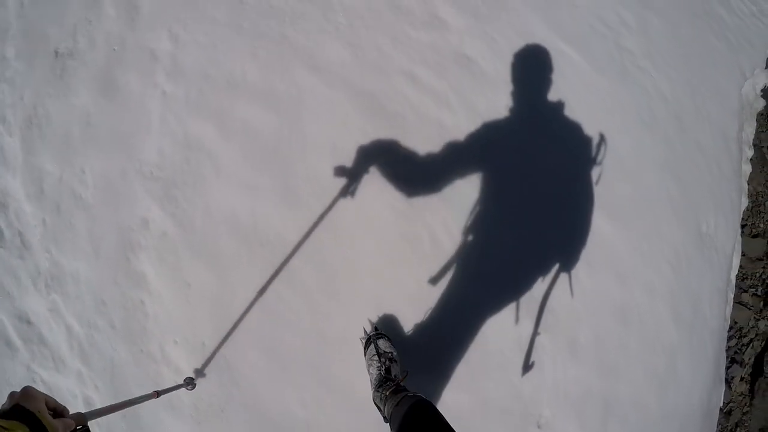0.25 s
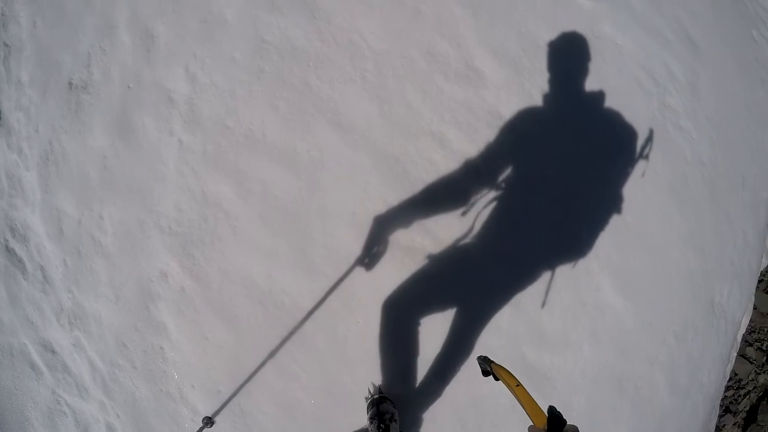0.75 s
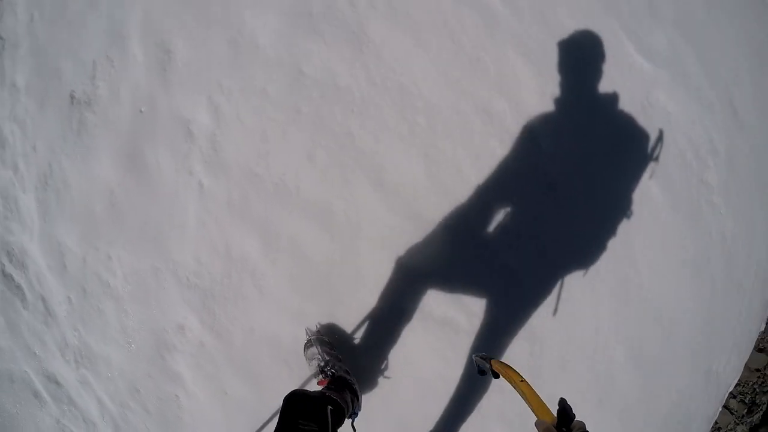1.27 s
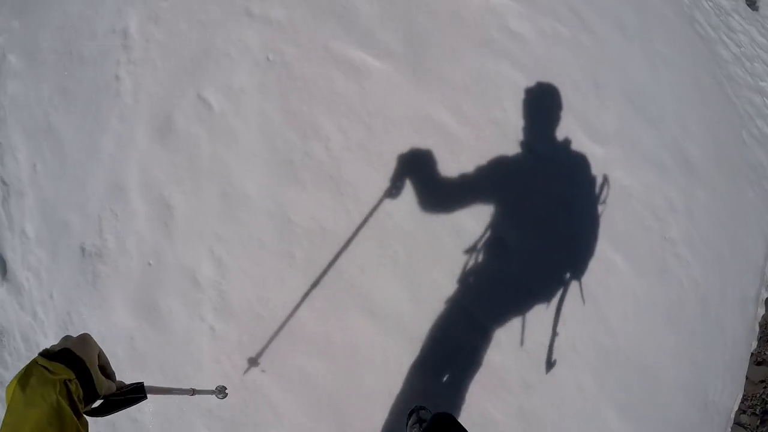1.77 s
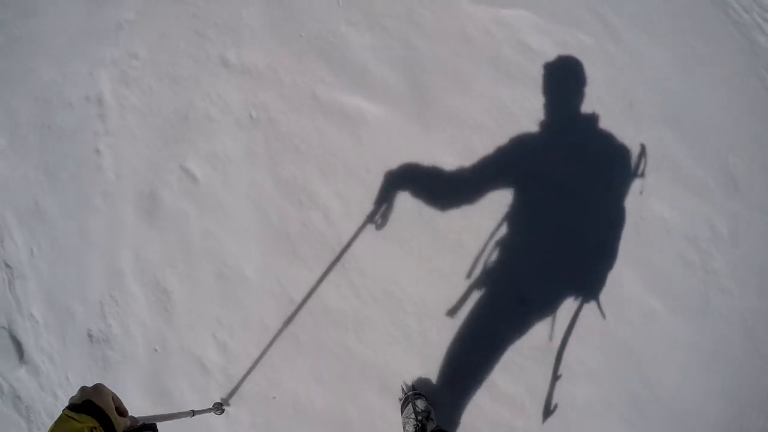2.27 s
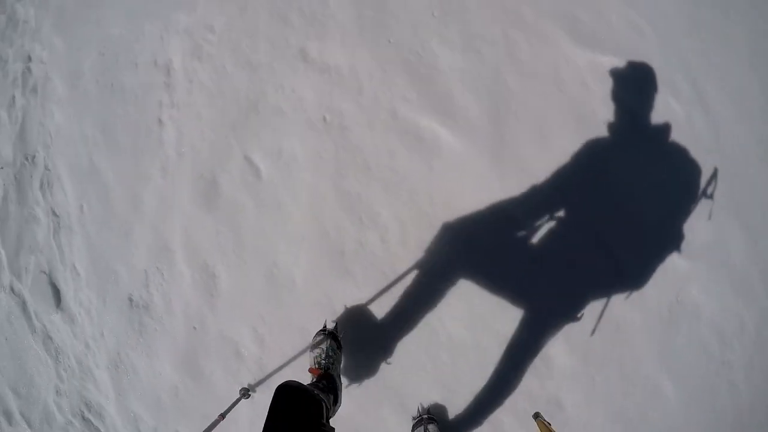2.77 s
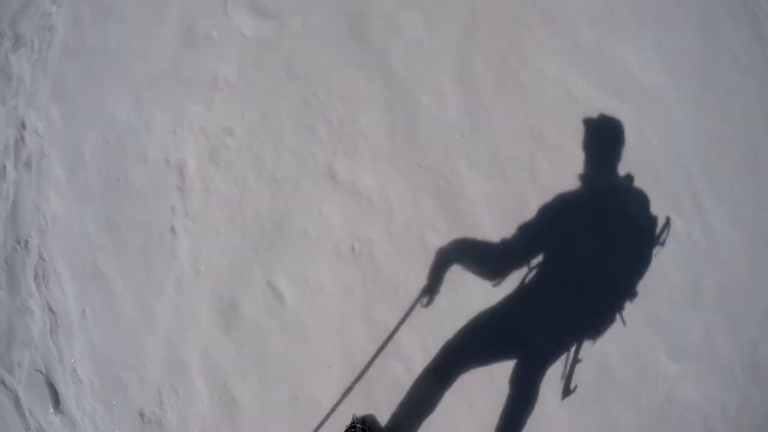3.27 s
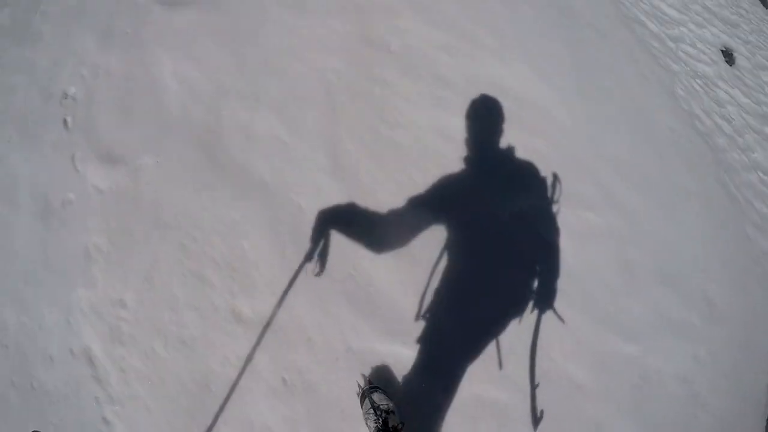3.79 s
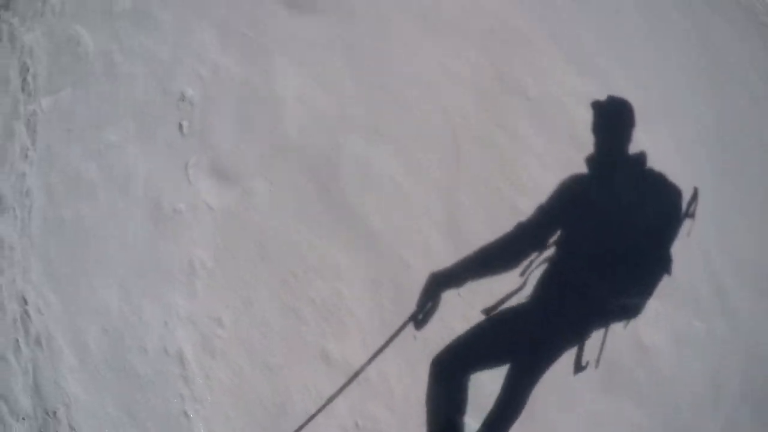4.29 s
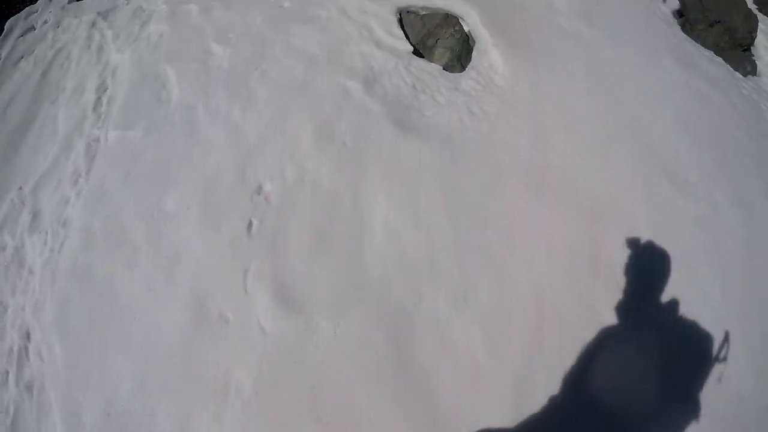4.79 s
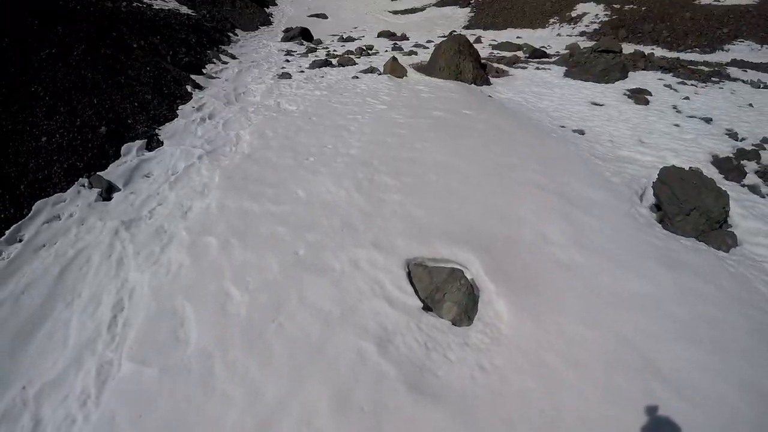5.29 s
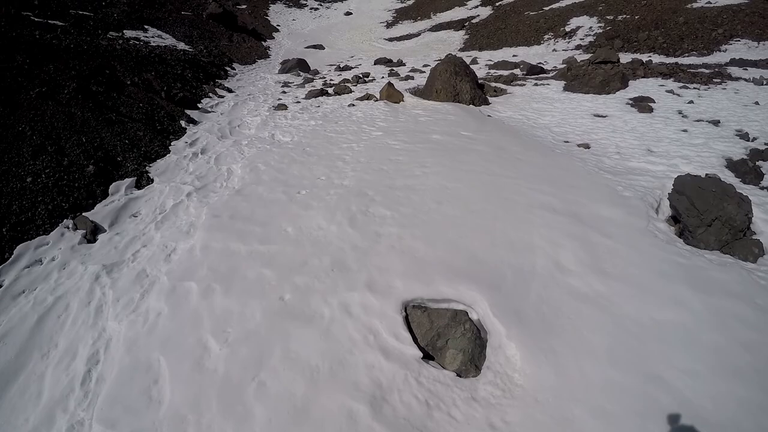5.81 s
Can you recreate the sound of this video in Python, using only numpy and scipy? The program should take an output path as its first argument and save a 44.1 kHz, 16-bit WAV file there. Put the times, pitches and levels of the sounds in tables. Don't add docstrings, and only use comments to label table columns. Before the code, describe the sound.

Outdoors on a snowy slope, heard from inside a closed camera case on a walker's helmet. Deep wind gusts thump the shell throughout, with soft jacket swishes and a humming strap rub. A boot crunches thinly into firm snow about every 0.9 seconds, with small cracks from spikes and pole tip between. Dull knocks punctuate the jolts, and the mount creaks and slips busily at the end.

```python
import sys
import numpy as np
from scipy import signal
from scipy.fft import rfft, irfft, next_fast_len
from scipy.io import wavfile
from scipy.ndimage import uniform_filter1d, map_coordinates

SR = 44100
rng = np.random.default_rng(int(sys.argv[2]) if len(sys.argv) > 2 else 0)


def elevation(decibels):
    levels = np.asarray(decibels, float)
    return 10 ** (levels / 20)


def put_to_file(sound):
    columns = np.atleast_2d(sound).T
    safe = np.clip(columns, -1, 1)
    whole_steps = np.round(safe * 32767)
    wavfile.write(sys.argv[1], SR, whole_steps.astype(np.int16))


N = 266805


def unit(x):
    return x / np.sqrt(np.mean(x ** 2) + 1e-20)


def even(x, seconds):
    power = np.abs(uniform_filter1d(x ** 2, round(seconds * SR)))
    return unit(x / (power + 1e-20) ** 0.3)


def curves(rows):
    s, *cols = np.transpose(rows)
    return [np.interp(np.arange(N) / SR, s, c) for c in cols]


def swells(rows, calm_db):
    t = np.arange(0, N + 32, 32) / SR
    power = sum(elevation(2 * db) * np.exp(-2 * ((t - s) / width) ** 2) for s, width, db in rows)
    return np.sqrt(elevation(2 * calm_db) + np.interp(np.arange(N) / SR, t, power))


def wobble(rate):
    knots = rng.standard_normal(int(N * rate / SR) + 4)
    return map_coordinates(knots, [np.arange(N) * rate / SR])


def grains(spiky_db):
    size_db = spiky_db * np.minimum(rng.exponential(size=N), 4)
    return unit(rng.standard_normal(N) * elevation(size_db))


def filtered(x, response):
    m = next_fast_len(N + 8192)
    return irfft(rfft(x, m) * response(np.fft.rfftfreq(m, 1 / SR)), m)[..., :N]


def shape(points):
    f, db = np.transpose(points)
    return lambda hz: elevation(np.interp(np.log(hz + 1), np.log(f + 1), db))


def resonances(peaks):
    def response(f):
        return sum((-1) ** k * elevation(db) * 1j * f * w / (c * c - f * f + 1j * f * w)
                   for k, (c, w, db) in enumerate(peaks))
    return response


def add(track, s, x):
    track[round(s * SR):][:len(x)] += x


# time_s, level_db
BREEZE = [(0, -42), (.45, -39.5), (.95, -44.5), (1.05, -49.5), (1.3, -41.5), (1.7, -41.5), (2.2, -37),
          (2.56, -49), (2.9, -44), (3.3, -45.5), (3.67, -40), (4.0, -35), (4.36, -46), (4.72, -35.5),
          (5.0, -33.5), (5.26, -39), (5.5, -31.5), (6.05, -35.5)]
# peak_s, half_width_s, level_db
GUSTS = [(.004, 0.038, -23.5), (.22, 0.023, -33.5), (.335, 0.039, -34), (.53, 0.058, -29), (.605, .05, -20),
         (.76, .12, -30), (.92, 0.045, -36.5), (1.16, 0.058, -34.5), (1.26, 0.05, -35),
         (1.43, 0.065, -30.5), (1.57, 0.043, -28.5), (1.77, 0.032, -32.5), (1.91, 0.037, -30.5),
         (2.0, 0.048, -29), (2.125, 0.024, -34.5), (2.35, 0.077, -30.5), (2.51, .03, -37),
         (3.12, 0.084, -35), (3.82, 0.072, -26.5), (4.07, 0.052, -28), (4.23, 0.055, -33.5),
         (4.55, 0.069, -28), (4.67, 0.032, -21.5), (4.87, 0.072, -27), (5.08, .04, -28),
         (5.155, 0.034, -24.5), (5.34, 0.026, -22.5), (5.58, 0.14, -29.5), (5.74, 0.059, -28),
         (5.94, 0.085, -30)]
# peak_s, half_width_s, level_db
EDDIES = [(.004, 0.024, -37.5), (.25, .04, -54), (.335, 0.027, -38.5), (.5, 0.059, -41.5), (.6, .04, -37.5),
          (.7, 0.066, -48), (.93, 0.046, -52.5), (1.16, 0.037, -38), (1.26, 0.033, -39.5), (1.56, .06, -55),
          (1.77, 0.046, -52), (1.92, .03, -52), (2.05, 0.047, -45), (2.21, .05, -48), (2.32, 0.041, -43),
          (2.51, .03, -46), (3.06, .1, -48.5), (3.84, 0.063, -40.5), (3.98, 0.047, -48), (4.19, 0.041, -47),
          (4.52, 0.03, -32), (4.74, 0.052, -35), (4.91, 0.035, -32.5), (5.07, 0.053, -37),
          (5.17, 0.037, -39.5), (5.34, .02, -40), (5.42, 0.025, -36), (5.48, .025, -33), (5.53, .02, -38),
          (5.575, 0.03, -31), (5.625, .02, -31), (5.67, 0.044, -27), (5.8, .05, -40), (5.9, 0.06, -33),
          (5.98, 0.048, -37.5)]
# pitch_hz, level_db (per Hz)
BUFFET = [(8.8, -61), (15, 0), (32, 3), (49, 3), (62, -3), (110, -30), (140, -56), (240, -120)]
# pitch_hz, level_db (per Hz)
FLUTTER = [(47, -34.5), (80, 2), (166, -13), (357, -33), (426, -42), (500, -40), (650, -81), (1100, -120)]


def wind():
    breeze_db, = curves(BREEZE)
    buffet = swells(GUSTS, breeze_db)
    flutter = swells(EDDIES, breeze_db - 20.5)
    slow = even(filtered(rng.standard_normal(N), shape(BUFFET)), 0.0545)
    fast = even(elevation(5.1 * wobble(30)) * filtered(rng.standard_normal(N), shape(FLUTTER)), 0.053)
    push = buffet * slow
    push = push / (1 + np.abs(push / .13) ** 4) ** .25
    return push + elevation(-1.5) * flutter * fast


# peak_s, half_width_s, swish_db, cloth_db (relative to the swish)
SWINGS = [
    (.03, 0.19, -71, 7),
    (.45, .3, -71, -1),
    (1.33, 0.46, -70, -0.5),
    (2.31, 0.15, -63.5, -6),
    (3.13, 0.21, -65.5, -4),
    (3.55, 0.36, -75.5, 3),
    (4.03, 0.16, -62, -2.5),
    (4.87, 0.14, -64, -6),
    (5.19, 0.074, -72, 9),
    (5.78, .12, -73, 6),
]
# pitch_hz, level_db (per Hz)
SWISH = [(2060, -58), (3500, -8), (5260, -2), (7790, -10), (8500, -14), (9250, -10.5), (10200, -16.5),
         (14300, -42)]
# pitch_hz, level_db (per Hz)
CLOTH = [(650, -47), (1100, -3), (1600, -3), (1830, -5.5), (2320, 0), (3500, -19.5), (4550, -27),
         (7700, -120)]


def clothes():
    swish = swells([row[:3] for row in SWINGS], calm_db=-72)
    cloth = swells([(s, width, db + share_db) for s, width, db, share_db in SWINGS], calm_db=-73)
    rub = elevation(2.05 * wobble(40) + 1.74 * wobble(250)) * grains(spiky_db=4.0)
    smooth = unit(filtered(rub, shape(SWISH)))
    heavy = unit(filtered(rub, shape(CLOTH)))
    return elevation(-3.0) * swish * smooth + elevation(-6.0) * cloth * heavy


# start_s, length_s, rub_db, grit_db (relative to the rub)
STROKES = [(0.081, 0.15, -52, -12.5), (0.202, 0.23, -58, -12), (0.441, 0.14, -56, -12.5),
           (0.724, 0.13, -56.5, -8), (0.79, 0.22, -51.5, -11), (1.1, 0.18, -52, -11),
           (1.277, 0.08, -49.5, -13), (1.38, .07, -58.5, -12), (1.459, .11, -53, -16),
           (1.58, .1, -61.5, -6.5), (1.732, .12, -58.5, -15.5), (1.98, .2, -65.5, -9.5),
           (2.217, 0.18, -54, -13), (2.421, .12, -52, -19), (2.6, .06, -52, -14), (2.72, .2, -63, -12),
           (2.93, 0.33, -55.5, -16), (3.228, 0.097, -58, -13), (3.478, .03, -54, -21),
           (3.51, 0.085, -58, -15), (3.777, .3, -61, -16), (4.088, .13, -54.5, -12),
           (4.233, .035, -42.5, -21), (4.468, .08, -53.5, -12), (4.658, .16, -53, -14.5),
           (4.832, 0.096, -53.5, -21), (4.95, 0.19, -61.5, -9.5), (5.163, 0.15, -57.5, -10),
           (5.33, 0.15, -71.5, 1.5), (5.502, 0.52, -59, -8)]
# pitch_hz, width_hz, level_db
HUM = [(278, 75, -3.5), (362, 64, 0)]
# pitch_hz, width_hz, level_db
GRIT = [(601, 80, 4.5), (825, 140, -4), (1027, 51, -1), (1870, 110, -8)]


def strap():
    rise_s, fall_s, slack_db = 0.021, .017, -76
    t = np.arange(N) / SR
    s, length, rub_db, grit_db = np.transpose(STROKES)[:, :, None]
    pull = np.clip((t - s) / rise_s + .5, 0, 1) ** 2
    pull = pull * np.exp(-2 * np.maximum(t - s - length, 0) / fall_s)
    force = np.sqrt(elevation(2 * slack_db) + (elevation(2 * rub_db) * pull).sum(axis=0))
    grit = np.sqrt(elevation(2 * slack_db) + (elevation(2 * (rub_db + grit_db)) * pull).sum(axis=0))
    rub = elevation(3.2 * wobble(45)) * grains(spiky_db=3)
    hum = even(filtered(rub, lambda f: resonances(HUM)(f) ** 1.115), 0.075)
    scrape = even(filtered(rub, resonances(GRIT)), 0.087)
    return elevation(-2.0) * force * hum + elevation(-0.43) * grit * scrape


# peak_s, half_width_s, level_db
WEBBING = [
    (.1, .16, -73),
    (3.4, 0.12, -70.5),
    (3.6, 0.085, -74.5),
    (3.745, 0.026, -64.5),
    (5.2, 0.036, -68.5),
]
# pitch_hz, width_hz, level_db
WEBBING_RING = [(2320, 320, 0)]


def webbing():
    rub = elevation(3.2 * wobble(60)) * grains(spiky_db=3.5)
    return swells(WEBBING, calm_db=-95) * unit(filtered(rub, resonances(WEBBING_RING)))


# start_s, length_s, pitch_hz, level_db (peak)
SQUEAKS = [(2.602, 0.03, 385, -41), (2.426, 0.015, 840, -53), (4.509, .028, 391, -32),
           (4.512, .022, 570, -38), (4.83, .02, 470, -38), (4.842, .02, 260, -38), (2.606, .025, 590, -54),
           (.75, .03, 590, -55), (.83, .03, 600, -56), (.9, .03, 570, -55), (.95, .03, 610, -56),
           (.49, .025, 360, -48), (.215, .025, 320, -48), (.995, .025, 350, -48), (5.153, .021, 325, -29.5),
           (2.425, .02, 340, -47), (2.458, .02, 370, -48), (2.645, .04, 590, -57), (2.73, .02, 340, -54),
           (3.477, .02, 340, -45), (5.795, .025, 325, -39), (5.83, .04, 330, -47), (5.652, .02, 230, -30),
           (4.235, .03, 385, -42)]


def squeaks():
    out = np.zeros(N + SR)
    for s, length, hz, db in SQUEAKS:
        t = np.arange(round(length * SR)) / SR
        note = np.sin(2 * np.pi * hz * t) + 0.084 * np.sin(4 * np.pi * hz * t)
        add(out, s, elevation(db) * np.sin(np.pi * t / length) * note)
    return out[:N]


# start_s, level_db (peak), pitch_hz,
# length_s
CRACKS = [(.2712, -57, 4960, .004), (.305, -51, 9200, .005), (.318, -54, 8900, .005),
          (.349, -51, 2300, .004), (.388, -58, 5000, .003), (0.5, -51, 5400, .004),
          (.7875, -57, 5250, .005), (1.2505, -50, 2000, .004), (1.135, -48, 7700, .006),
          (1.148, -51, 9200, .005), (1.5243, -54, 6410, .01), (2.04, -52, 9300, .005),
          (2.055, -54, 7800, .005), (2.1893, -62, 5400, .005), (2.306, -56, 5270, .005),
          (2.503, -51, 2100, .004), (2.5121, -53, 6480, .008), (2.61, -57, 1050, .014),
          (2.612, -59, 1750, .012), (2.655, -63, 1700, .012), (2.849, -56, 2200, .004),
          (3.18, -57, 5020, .004), (3.304, -58, 7200, .006), (3.318, -52, 6450, .012),
          (3.716, -53, 4520, .006), (3.733, -55, 4500, .005), (3.785, -57, 1350, .02),
          (3.794, -52, 9100, .012), (3.804, -54, 7600, .01), (3.999, -58, 5450, .004),
          (4.039, -55, 4680, .004), (4.123, -58, 4310, .004), (4.225, -57, 7500, .006),
          (4.685, -52, 9000, .005), (4.697, -54, 6000, .005), (4.802, -60, 5280, .004),
          (5.1503, -55, 3400, 0.0046), (5.1515, -51, 2150, .005), (5.3094, -54, 2100, .006),
          (5.648, -55, 2400, .004), (5.692, -54, 2450, .005), (5.699, -52, 1950, .008),
          (5.794, -54, 1650, .005), (5.795, -57, 2600, .004), (5.81, -57, 2350, .01),
          (.2995, -57, 12300, .003), (.299, -55, 9200, .003), (4.832, -43, 1040, .012),
         (1.133, -52, 10800, .006), (1.135, -51, 5000, .008), (3.828, -56, 9200, .006),
         (1.1315, -56, 12600, .003), (1.16, -60, 11800, .004), (2.035, -58, 11800, .003),
         (2.93, -52, 9200, .003), (2.931, -58, 11500, .003), (3.783, -51, 9300, .003),
         (3.785, -58, 12300, .003), (4.678, -52, 9200, .003), (4.6785, -58, 12500, .003),
         (4.833, -55, 1350, .008), (4.834, -59, 2150, .005), (5.998, -57, 1800, .012)]


def cracks():
    out = np.zeros(N + SR)
    t, f = np.arange(2048) / SR, np.fft.rfftfreq(2048, 1 / SR)
    for s, db, hz, length in CRACKS:
        burst = rng.standard_normal(len(t)) * (1 - np.exp(-t / .0006)) * np.exp(-(t / length) ** 2)
        ring = irfft(rfft(burst) * resonances([(hz, hz / 10, 0)])(f))
        add(out, s, elevation(db) * ring / np.abs(ring).max())
    return out[:N]


# time_s, level_db (peak), crush_s
STEPS = [
    (0.2975, -46, 0.023),
    (1.131, -43, 0.019),
    (2.033, -47, 0.022),
    (2.9275, -47, 0.016),
    (3.782, -44, 0.019),
    (4.676, -47, 0.025),
]
# time_s, level_db (peak), coarse_db, pack_db (both relative), crush_s
CRUMBS = [(0.3444, -64, 5, 9.5, 0.013), (0.4673, -61, 1.5, -11, 0.0093), (0.4988, -60, 3, -7, 0.0063),
          (0.5501, -57, -3, -5, 0.0088), (0.6998, -53.5, -4.5, -14, 0.012), (1.2994, -58, -8, 1, 0.0092),
          (1.4394, -58.5, -1, -8, 0.0089), (1.5239, -60, -14, -11, 0.0093), (2.3062, -65, -5, -7, 0.021),
          (2.5117, -58, -3, -12, 0.0094), (2.9494, -61, -15, -16, 0.0097), (3.1094, -60, -9, -13, 0.019),
          (3.3106, -54, -5, -12, 0.012), (3.715, -57, 3, 4, 0.0072), (3.732, -64, 3, 1, 0.007),
          (3.824, -56, -9, -8, 0.0092), (4.038, -56, 4, -7, 0.0044), (4.1215, -62, 4.5, 0, 0.0092),
          (4.2194, -59.5, -1, -7, 0.021), (4.8294, -58, -3, -5, 0.0087), (5.1494, -59, 3, 10.5, 0.006),
          (5.6471, -60, -2, 3, 0.013), (5.692, -63, 0, 11, 0.011), (5.795, -68, 0, 12, 0.013)]
# pitch_hz, width_hz, level_db
FINE = [(6860, 910, -6), (7870, 430, 0.5), (9200, 320, 5), (11200, 1600, -9.5), (12700, 990, -14)]
# pitch_hz, width_hz, level_db
COARSE = [(3440, 540, -2.5), (4940, 630, 3), (5850, 1100, -0.5)]
# pitch_hz, width_hz, level_db
PACKING = [(1440, 330, -3), (1890, 250, 0), (2470, 310, -1.5)]


def snow():
    rise_share = 0.42
    t = np.arange(SR // 5) / SR

    def press(hold):
        rise = 1 - np.exp(-(t / (rise_share * hold)) ** 2)
        return rise / np.sqrt(1 + (t / hold) ** 4) * (t < 6 * hold)

    def crunch(peaks):
        return unit(filtered(elevation(2.6 * wobble(250)) * grains(spiky_db=4.2), resonances(peaks)))

    fine, coarse, pack = np.zeros((3, N + SR))
    steps = [(s, db, -7.5, -12.5, crush) for s, db, crush in STEPS]
    for s, db, coarse_db, pack_db, crush in steps + CRUMBS:
        start = s - rise_share * crush
        add(fine, start, elevation(db - 10.5) * press(crush))
        add(coarse, start, elevation(db + coarse_db - 5) * press(1.36 * crush))
        add(pack, start, elevation(db + pack_db - 6.0) * press(1.4 * crush))
    return fine[:N] * crunch(FINE) + coarse[:N] * crunch(COARSE) + pack[:N] * crunch(PACKING)


# pitch_hz, width_hz, level_db
BOOM = [(153, 140, -11.5), (268, 76, 3.5), (380, 100, 0.5)]
# pitch_hz, width_hz, level_db
KNOCK = [(570, 120, -2.5), (695, 110, -2.5), (830, 150, -3.5), (1015, 85, 3)]
# pitch_hz, width_hz, level_db
TICK = [(1340, 69, -6.5), (1790, 144, -3.5), (2010, 260, -6), (3000, 790, -17)]


def blow(boom_db, tick_db, scatter_db, top_hz=6000, pad_hz=1500):
    modes = []
    for rows, extra_db in ((BOOM, boom_db), (KNOCK, 0), (TICK, tick_db)):
        for hz, width, db in rows:
            modes.append((hz, width, db + extra_db + rng.normal(0, scatter_db)))
    f = np.fft.rfftfreq(4096, 1 / SR)
    soft = 1 / (1 + 1j * f / pad_hz) ** 3 / (1 + (f / top_hz) ** 14)
    dead_hz, dead_wide_hz, left = 1160, 260, .15
    gap = dead_hz ** 2 - f * f
    dead = (gap + 1j * f * dead_wide_hz * left) / (gap + 1j * f * dead_wide_hz)
    bending = .017
    late = np.exp(-4j * np.pi * bending * np.sqrt(f))
    return irfft(resonances(modes)(f + 1) * soft * dead * late)


# time_s, level_db (peak), boom_db, tick_db (both relative)
KNOCKS = [(0.551, -62, 0, 1), (0.683, -31.5, -7.5, -35), (1.109, -52, -18, -8), (1.253, -26, -8, -25),
          (1.534, -26.5, -10, -28.5), (2.05, -49, -5, -9), (2.505, -25, -8.5, -24.5),
          (2.749, -55, -11, -11), (2.849, -46, -14, -11), (3.194, -31, -7.5, -31), (3.713, -56, -12, -5),
          (4.212, -28.5, -8, -40), (4.807, -58, 6, -20), (5.152, -28.5, -12, -28), (5.221, -46.5, -5, -24),
          (5.296, -40, -9, -30), (5.311, -45, -18, -15), (5.647, -35, -1, -36)]
# delay_s, level_db
CHATTER = [
    (-.0006, -14),
    (.0016, -13),
    (.0027, 3),
    (.0095, -11.5),
]


def knocks():
    out = np.zeros(N + SR)
    for s, db, boom_db, tick_db in KNOCKS:
        for late, more_db in CHATTER:
            at = s - .0038 + late + rng.normal(0, 0.0001)
            hit = elevation(db + 32.2 + more_db) * blow(boom_db + 14.3, tick_db + 14.5, scatter_db=0.6)
            add(out, at, hit)
            add(out, at + .0125 + late, elevation(-20) * hit)
    return out[:N]


CREAK_TOP_HZ = 2150

# start_s, length_s, level_db (rms), boom_db, tick_db (both relative)
CREAKS = [
    (4.51, 0.026, -41, -2, -4),
    (4.827, 0.022, -39, -2, -14),
    (5.684, 0.03, -45, -15, -32),
    (5.752, 0.045, -50, -3, -22),
    (5.79, 0.058, -46, -2.5, -24),
    (5.843, 0.072, -50.5, 3, -21),
    (2.9, 0.035, -63.5, -2, -1),
    (5.99, .02, -55, -1.5, -1),
    (5.152, 0.014, -40.5, -3, -17),
    (4.9, 0.013, -60, 0, -6),
]


def creaks():
    out = np.zeros(N + SR)
    for s, length, db, boom_db, tick_db in CREAKS:
        run = np.zeros(SR // 2)
        gap = rng.uniform(.4, 1.6, 60) / 560
        size_db = rng.normal(0, 2.5, 60)
        slip = blow(boom_db + 5.0, tick_db + 12.5, scatter_db=2.0, top_hz=CREAK_TOP_HZ, pad_hz=900)
        for late, more_db in zip(np.cumsum(gap) - gap[0], size_db):
            swell = np.clip(np.sin(np.pi * (late + 0.0038) / (length + 0.0043)), 0, 1)
            push = np.sqrt(swell) * (late < length)
            add(run, late, push * elevation(more_db) * slip)
        add(out, s - .002, elevation(db) * run / np.std(run[:round((length + .01) * SR)]))
    return out[:N]


# time_s, level_db (peak)
SLIPS = [(4.533, -45), (5.647, -37), (5.654, -43), (5.687, -37), (5.691, -40), (5.696, -33), (5.703, -33.5),
         (5.71, -44), (5.721, -52), (5.747, -50), (5.76, -48), (5.772, -49), (5.778, -44), (5.786, -42),
         (5.794, -35), (5.801, -41), (5.808, -40), (5.819, -38), (5.826, -41), (5.834, -44), (5.842, -50),
         (5.875, -51), (5.885, -47), (5.895, -51), (5.919, -54), (5.931, -56), (5.996, -50), (6.003, -52),
         (4.5115, -35), (4.523, -37), (4.526, -38), (4.884, -50), (2.93, -52)]


def slips():
    out = np.zeros(N + SR)
    for s, db in SLIPS:
        jerk = blow(-9.0, -3.0, scatter_db=3.0, top_hz=CREAK_TOP_HZ, pad_hz=780)
        add(out, s - .0015, elevation(db - .6) * jerk / np.abs(jerk).max())
    return out[:N]


def scene():
    air_and_cloth = wind() + clothes() + strap() + webbing()
    ground = cracks() + snow()
    mount = squeaks() + knocks() + creaks() + slips()
    return (air_and_cloth + ground + mount)[None]


def starve(x):
    starved_hz = 12700
    hz, t, z = signal.stft(x, SR, nperseg=256)
    load_db = 10 * np.log10(np.abs(uniform_filter1d(x[0] ** 2, SR // 12)) + 1e-12)
    load_db = load_db[np.minimum((t * SR).astype(int), N - 1)]
    luck = rng.uniform(size=(33, len(t) // 3 + 1))
    luck = np.repeat(np.repeat(luck, 4, 0), 3, 1)[:len(hz), :len(t)]
    odds = .5 / (1 + np.exp(-(load_db + 33) / 3))
    odds = odds * np.clip(.45 + (hz[:, None] - starved_hz) / 4000, 0, 1)
    lost = (luck < odds) & (hz[:, None] > starved_hz)
    return signal.istft(z * np.where(lost, elevation(-25), 1), SR, nperseg=256)[1][:, :N]


def top_cut(x):
    return signal.sosfilt(signal.butter(12, 16120, fs=SR, output="sos"), x)


# pitch_hz, level_db (per Hz)
HISS = [(88, -47), (150, -9.5), (217, -9), (615, -23.5), (905, -21), (2830, -24.5), (7880, -32),
        (15200, -33)]


def record(dry):
    x = dry + elevation(-64) * unit(filtered(rng.standard_normal(N), shape(HISS)))
    x = x * np.minimum(.5 + np.arange(N) / (.006 * SR), 1)
    x = filtered(starve(x), lambda hz: np.where(hz < 15320, 1, elevation(-35)))
    return top_cut(x)


dry = scene()
out = record(dry)
put_to_file(out)
```